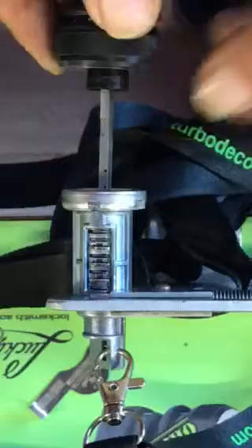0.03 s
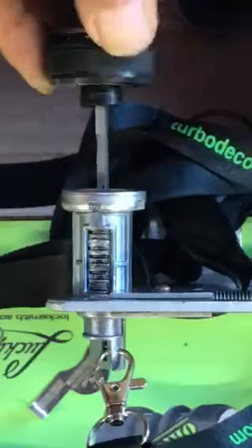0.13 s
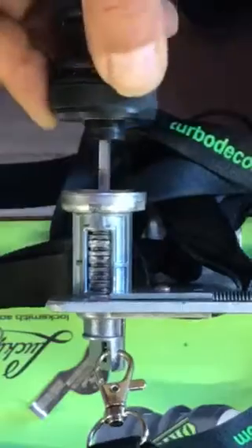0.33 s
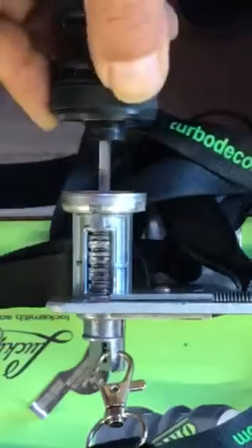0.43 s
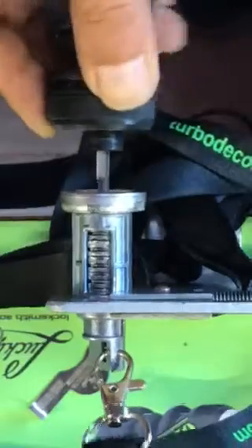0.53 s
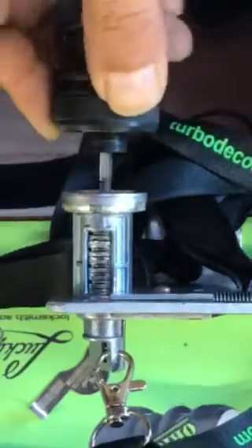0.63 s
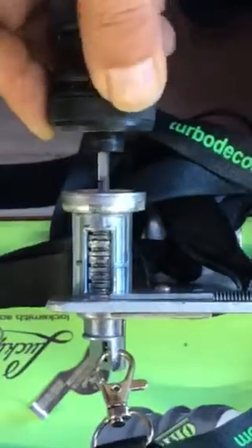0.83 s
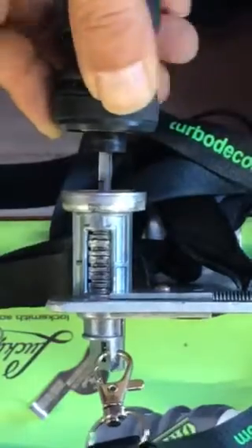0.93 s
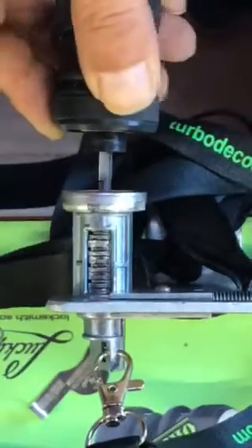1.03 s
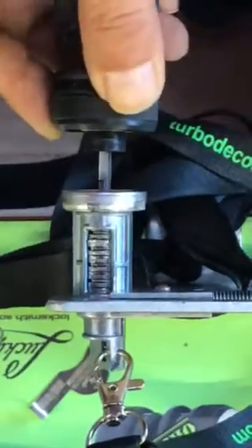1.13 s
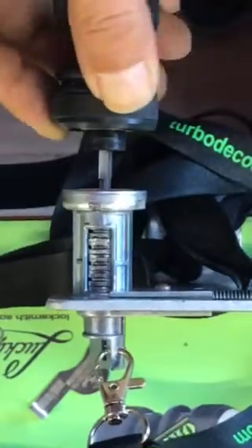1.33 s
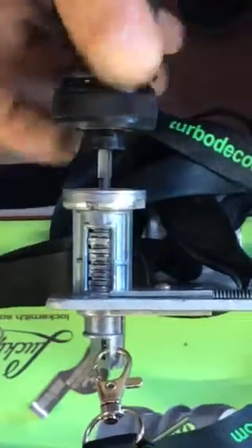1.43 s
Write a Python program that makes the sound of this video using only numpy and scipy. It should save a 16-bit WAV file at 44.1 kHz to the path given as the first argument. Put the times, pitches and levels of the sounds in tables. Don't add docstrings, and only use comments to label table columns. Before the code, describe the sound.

A metal blade slides into a lock cylinder with a rapid burst of sharp clicks and small ringing knocks, low thumps from the bench underneath, then a few faint ticks; close microphone in a small room.

```python
import sys
import numpy as np
from scipy import signal
from scipy.fft import rfft, irfft
from scipy.io import wavfile
from scipy.ndimage import uniform_filter1d

SR = 44100
rng = np.random.default_rng(int(sys.argv[2]) if len(sys.argv) > 2 else 0)


def store_wav(level_fs):
    pcm = np.round(np.clip(np.atleast_2d(level_fs), -1, 1) * 32767)
    wavfile.write(sys.argv[1], SR, pcm.T.astype(np.int16))


def voltage_ratio(level):
    return 10 ** (np.asarray(level, float) / 20)


N = 66150


def evened(x):
    return x / np.sqrt(np.mean(x ** 2) + 1e-20)


def read_curve(points, hz):
    point_hz, value = np.transpose(points)
    return np.interp(np.log(hz + 1), np.log(point_hz + 1), value)


def add(mix, start_s, sound):
    part = mix[round(start_s * SR):][:len(sound)]
    part += sound[:len(part)]


def filter_taps(gain_db):
    log_gain = np.log(voltage_ratio(np.maximum(gain_db, -100)))
    both_sides = np.concatenate([log_gain, log_gain[-2:0:-1]])
    response = np.exp(np.conj(signal.hilbert(both_sides)))
    return np.fft.ifft(response).real[:1024]


def bell(hz, centre_hz, octaves):
    return -6 * (np.log2((hz + 1) / centre_hz) / octaves) ** 2


def ring(modes, weight_db, chance, seconds=.5):
    t = np.arange(round(seconds * SR)) / SR
    pitch_hz, level_db, t60_s = np.transpose(modes)[:, :, None]
    count = len(modes)
    strike_db = 1 * chance[:count, None]
    sign = np.sign(chance[count:2 * count, None])
    gain = voltage_ratio(level_db + weight_db + strike_db - 60 * t / t60_s)
    return (gain * sign * np.sin(2 * np.pi * pitch_hz * t)).sum(0) / np.sqrt(count)


def rattled(x, noise, smooth_s, depth):
    flutter = evened(uniform_filter1d(noise[:len(x)], max(int(smooth_s * SR), 2)))
    return x * (1 + depth * flutter) / np.sqrt(1 + depth ** 2)


# pitch_hz, level_db (per Hz)
HUSH = [(15, -46), (25, -9.5), (87, -25.5), (114, -23), (766, -32), (1830, -30), (5720, -41), (11900, -43),
        (16500, -46)]
# pitch_hz, width_hz, level_db
FAN_TONES = [(85, 5.6, -74.5), (1790, 63, -81), (12120, 290, -81)]


def air():
    hz = np.fft.rfftfreq(N, 1 / SR)
    hush = irfft(rfft(rng.standard_normal(N)) * voltage_ratio(read_curve(HUSH, hz)), N)
    out = voltage_ratio(-67) * evened(hush)
    for pitch_hz, width_hz, level_db in FAN_TONES:
        peak = 1 + (2 * (hz - pitch_hz) / width_hz) ** 2
        out += voltage_ratio(level_db) * evened(irfft(rfft(rng.standard_normal(N)) / peak, N))
    return out


# pitch_hz, t60_s (time to fall 60 dB)
ECHO_TIMES = [(200, 1), (1000, 0.26), (2000, 0.3), (4000, 0.29), (8000, 0.27), (15000, 0.17)]


def room(x, scatter_hz):
    delay_s, early_db, early_t60_s = 0.0027, -8, 0.11
    hz, t, bands = signal.stft(rng.standard_normal((3, SR // 2)), SR, nperseg=256)
    late = voltage_ratio(-60 * t / read_curve(ECHO_TIMES, hz)[:, None])
    early = voltage_ratio(early_db - 60 * t / early_t60_s)
    tails = signal.istft(bands * (late + early), SR, nperseg=256)[1]
    tails = np.pad(tails / np.linalg.norm(tails[0]), ((0, 0), (round(delay_s * SR), 0)))
    cycles = scatter_hz * np.arange(N) / SR + np.arange(3)[:, None] / 3
    turn = np.sqrt(2 / 3) * np.cos(2 * np.pi * cycles)
    return signal.fftconvolve(x * turn, tails, axes=1)[:, :N].sum(0)


# start_s, panel_level_db, panel_centre_hz, boom_level_db, boom_centre_hz
PUSHES = [(0.029, -56, 290, -45.5, 100), (0.094, -39, 317, -44, 100), (0.133, -49, 223, -45, 125),
          (0.183, -42, 303, -34, 86.5), (0.206, -40, 298, -33.5, 85), (0.246, -45, 214, -33, 85),
          (0.315, -47, 250, -26.5, 73.4), (0.332, -37.5, 287, -31.5, 79), (0.395, -41, 218, -30.5, 82),
          (0.434, -32, 312, -35, 84), (0.472, -43, 315, -28, 106), (0.513, -40.5, 205, -43, 114),
          (0.606, -31.5, 312, -24.5, 87), (0.645, -43, 348, -25, 110), (0.693, -45, 205, -36.5, 121),
          (.736, -40.5, 300, -33.5, 87), (0.784, -53, 312, -41, 100), (0.874, -50.5, 320, -46, 64),
          (0.936, -51.5, 333, -45, 72.3), (1.029, -50.5, 314, -46.5, 86.4), (1.331, -60, 330, -75, 85),
          (0.351, -44, 467, -35, 105), (0.817, -48, 205, -42, 92), (0.558, -73, 300, -38, 100),
          (1.06, -57, 500, -54.5, 128)]
# pitch_hz, level_db, t60_s
PANEL = [(205, 4, 0.15), (245, -7, 0.17), (302.3, 4, 0.18), (317.6, 2.5, 0.25), (356, -2, 0.26),
         (444.4, 8, 0.11), (500, 7.5, 0.095), (609, 15, 0.12), (640, -5, 0.04)]
# pitch_hz, level_db, t60_s
BOOM = [(47.4, -21, 0.22), (67.5, -20, 0.11), (78.44, -8, 0.42), (100, -6, 0.23), (129.3, 3.5, 0.21),
        (161, 4, 0.12)]


def bench():
    panel_octaves, panel_push_s = 0.48, 0.0014
    boom_octaves, boom_push_s = 0.49, 0.0082
    out, t = np.zeros(N), np.arange(1500) / SR
    chances = rng.standard_normal((len(PUSHES), 40))
    for (start_s, panel_db, panel_hz, boom_db, boom_hz), chance in zip(PUSHES, chances):
        parts = ((PANEL, panel_db, panel_hz, panel_octaves, panel_push_s, chance),
                 (BOOM, boom_db + 4, boom_hz, boom_octaves, boom_push_s, chance[20:]))
        for modes, level_db, centre_hz, octaves, push_s, part_chance in parts:
            push = t / push_s * np.exp(-t / push_s * 3)
            weight_db = level_db + bell(np.transpose(modes)[0][:, None], centre_hz, octaves)
            sound = signal.fftconvolve(ring(modes, weight_db, part_chance), push / push.sum())
            add(out, start_s, voltage_ratio(5.5) * sound)
    low_cut = signal.butter(3, 52, "high", fs=SR, output="sos")
    return signal.sosfilt(low_cut, rattled(out, rng.standard_normal(N), 0.0052, depth=.2))


# start_s, level_db, free_s (until a wafer damps it), top_hz, low_hz
FLICKS = [
    (.6185, -32, .024, 16000, 7000),
    (.738, -48, .02, 10000, 8500),
]
# pitch_hz, level_db, t60_s
SPRING = [(8215, 0, .09), (8390, -2, .09), (8730, -3, .35), (13550, -3, .22)]


def spring():
    damped_db = -11
    out, t = np.zeros(N), np.arange(13230) / SR
    hz = np.transpose(SPRING)[0][:, None]
    chances = rng.standard_normal((len(FLICKS), 13230))
    for (start_s, level_db, free_s, top_hz, low_hz), chance in zip(FLICKS, chances):
        weight_db = -30. * ((hz > top_hz) | (hz < low_hz))
        sound = ring(SPRING, weight_db, .1 * chance, seconds=.3)
        rise = np.minimum(t / .0015, 1)
        damping = voltage_ratio(damped_db * np.clip((t - free_s) / .003, 0, 1))
        add(out, start_s, voltage_ratio(level_db) * rattled(sound, chance, .006, .3) * rise * damping)
    return out


# start_s, pitch_hz, level_db, t60_s
PINGS = [(.0895, 2300, -40, .018), (.278, 1150, -54, .05), (.346, 1250, -36, .05), (.4315, 1620, -33, .05),
         (.6095, 1200, -30, .05), (.7325, 1770, -30, .16), (.733, 1560, -38, .25), (.734, 1060, -36, .3),
         (.734, 1220, -36, .08), (.732, 4400, -42, .025), (.8722, 4900, -49, .014), (.9325, 1250, -44, .06),
         (1.028, 4700, -50, .014), (1.0285, 1700, -50, .04), (1.33, 1200, -46, .055),
         (1.333, 560, -55, .08), (1.33, 2700, -57, .035)]


def pings():
    out, t = np.zeros(N), np.arange(13230) / SR
    chances = rng.standard_normal((len(PINGS), 13230))
    for (start_s, pitch_hz, level_db, t60_s), chance in zip(PINGS, chances):
        fade = voltage_ratio(level_db - 60 * t / t60_s)
        tone = fade * np.minimum(t / .0012, 1) * np.sin(2 * np.pi * pitch_hz * t)
        add(out, start_s, rattled(tone, chance, 0.0067, .3))
    return out


KNOCK_TIMES = [.0893, .092, .178, .207, .3075, .316, .328, .341, .345, .4315, .4335, .603, .6085, .676,
               .7325, .734, .874, .932, 1.028, 1.329, 1.43]
# level_db, rise_s, centre_hz (of the tones struck), spread_octaves
KNOCKS = [(-47, 0.002, 2500, 0.32), (-46, 0.0007, 920, 0.59), (-49, 0.007, 1150, 0.6),
          (-45, 0.001, 2200, 0.9), (-42.5, 0.0046, 1800, 1), (-40.5, .002, 1084, 0.62),
          (-46.5, 0.0061, 1400, 1), (-41, 0.002, 1300, 0.7), (-39, 0.002, 1300, 0.4),
          (-30, 0.00095, 2060, 0.56), (-37.5, 0.004, 800, 0.62), (-36, 0.0043, 1260, 0.41),
          (-34, 0.002, 1200, 0.56), (-45, 0.0028, 1160, 0.19), (-32, 0.0012, 1800, 0.14),
          (-36, 0.002, 950, 0.22), (-51, .002, 1100, 1), (-50, 0.0015, 1300, .4), (-49, 0.0027, 920, 0.59),
          (-55, 0.0015, 1250, .3), (-59, 0.004, 1200, 0.35)]
# pitch_hz, level_db, t60_s
BODY = [(620, -3, .07), (855, -2, .07), (950, -3, .07), (1060, -1, .09), (1224, -1, .05), (1325, -2, .05),
        (1404, -1, .05), (1588, 0, .06), (1690, 0, .05), (1790, 0, .08), (1900, -3, .05), (2260, -4, .035),
        (2590, -4, .04), (3050, -6, .03)]


def knocks():
    thud_db, thud_t60_s, thud_spread = -19.5, 0.16, 1.876
    snap_db, snap_s = -2.5, 0.0022
    out, t, hz = np.zeros(N), np.arange(8820) / SR, np.fft.rfftfreq(2048, 1 / SR)
    chances = rng.standard_normal((len(KNOCKS), 2, 8820))
    for start_s, (level_db, rise_s, centre_hz, octaves), chance in zip(KNOCK_TIMES, KNOCKS, chances):
        weight_db = bell(np.transpose(BODY)[0][:, None], centre_hz, octaves)
        body = ring(BODY, weight_db, chance[0], seconds=.2) / np.sqrt(np.mean(voltage_ratio(weight_db) ** 2))
        body = rattled(body, chance[0], 0.0033, .35)
        taps = filter_taps(bell(hz, centre_hz, thud_spread * octaves))
        tail = voltage_ratio(thud_db - 60 * t / thud_t60_s)
        snap = voltage_ratio(snap_db) * np.exp(-((t - rise_s) / snap_s) ** 2)
        thud = np.convolve(chance[1] * (tail + snap), taps / np.linalg.norm(taps))[:8820]
        add(out, start_s, voltage_ratio(level_db + 3.5) * np.minimum(t / rise_s, 1) * (body + thud))
    return out


TICK_TIMES = [.0887, .1015, .1376, .1765, .190, .194, .2065, .3067, .310, .315, .3275, .3372, .410, .4285,
              .4312, .5993, .6035, .673, .7317, .9348, .799, .872, .893, .929, .931, 1.0276, 1.034, 1.323,
              1.329]
# level_db, rattle_s, centre_hz (brightest pitch)
TICKS = [(-37, 0.00084, 600), (-72, .002, 10000), (-69, 0.0011, 4500), (-47, 0.0065, 2900),
         (-51, 0.0042, 11000), (-47.5, 0.005, 4200), (-60, 0.0017, 2200), (-44, 0.0096, 10000),
         (-38.5, 0.0049, 16000), (-43, 0.0017, 7700), (-42, 0.0083, 9500), (-34, 0.0038, 17000),
         (-47, 0.0023, 71000), (-37, 0.0038, 7100), (-27.5, 0.0026, 4000), (-35, 0.004, 2600),
         (-29, 0.0059, 7700), (-46.5, 0.0049, 2900), (-35.5, 0.0045, 1100), (-56.5, 0.0063, 2300),
         (-47.5, 0.0013, 3200), (-50, 0.0018, 3400), (-60, 0.0023, 4200), (-63, 0.0039, 6700),
         (-51, 0.0018, 13000), (-55, 0.0067, 1700), (-54.5, 0.003, 8700), (-61, 0.0018, 3000),
         (-67.5, 0.0088, 2700)]


def ticks():
    out, t, hz = np.zeros(N), np.arange(1200) / SR, np.fft.rfftfreq(2048, 1 / SR)
    chances = rng.standard_normal((len(TICKS), 2, 1200))
    for start_s, (level_db, rattle_s, centre_hz), (noise, grain) in zip(TICK_TIMES, TICKS, chances):
        grain_db = 3 * np.repeat(grain, 12)[:1200]
        shape = np.exp(-(t / rattle_s) ** 2) * np.minimum(t / 0.00017, 1)
        rattle = noise * voltage_ratio(grain_db) * shape
        taps = filter_taps(bell(hz, centre_hz, octaves=2.76))
        add(out, start_s, voltage_ratio(level_db) * np.convolve(rattle, taps / np.linalg.norm(taps)))
    return out


def scene():
    tick, knock, wood, song = ticks(), knocks() + pings(), bench(), spring()
    echoes = room(tick, scatter_hz=230) + room(knock, scatter_hz=30.66)
    echoes += room(0.25 * wood + .5 * song, scatter_hz=1.7)
    return (tick + knock + wood + song + voltage_ratio(-5.5) * echoes + air())[None]


def band_limit(x):
    return signal.sosfilt(signal.butter(12, 16670, fs=SR, output="sos"), x)


# pitch_hz, level_db
MICROPHONE = [(25, -17), (60, 12), (3500, -0.5), (5000, -2.5), (10500, -6), (13000, -4.5), (15600, -4),
              (16600, -48)]


def record(dry):
    taps = filter_taps(read_curve(MICROPHONE, np.fft.rfftfreq(2048, 1 / SR)))
    mix = signal.oaconvolve(dry, taps[None])[:, :N]
    return band_limit(mix)


dry = scene()
out = record(dry)
store_wav(out)
```